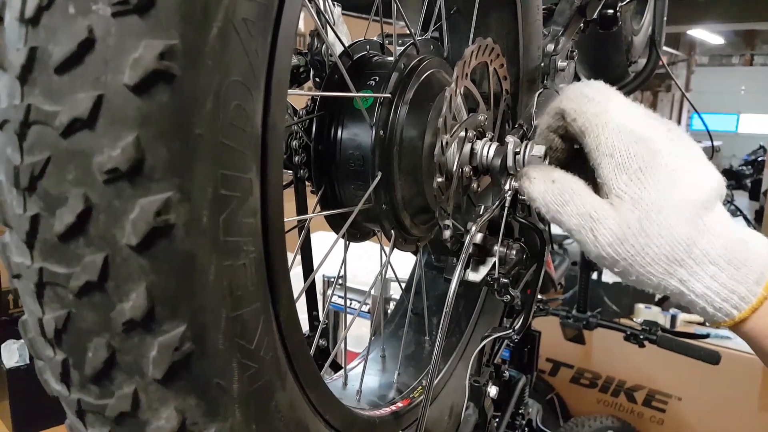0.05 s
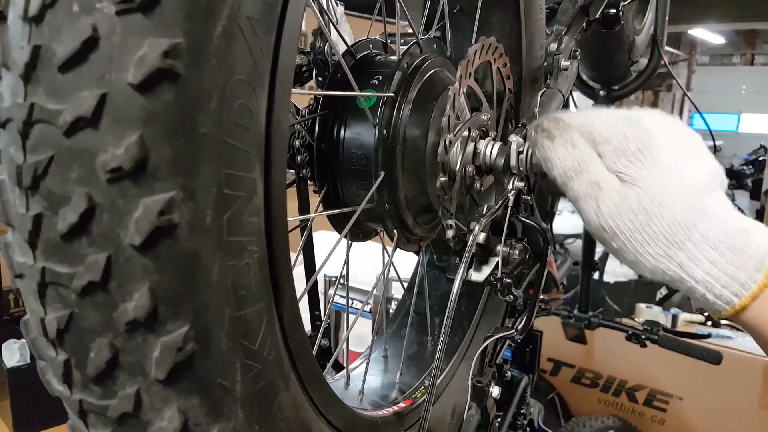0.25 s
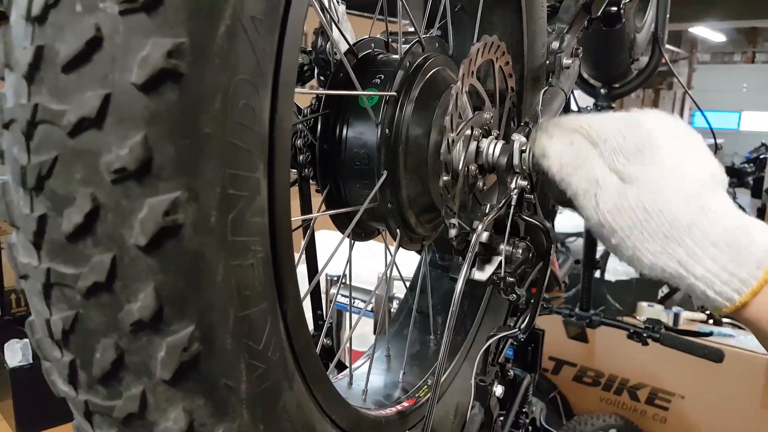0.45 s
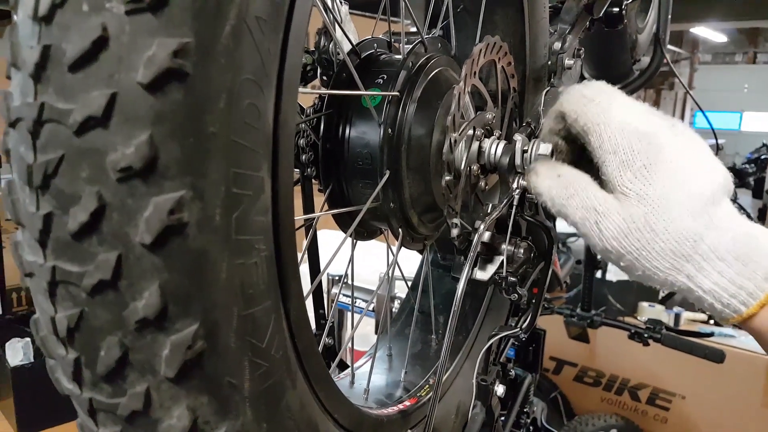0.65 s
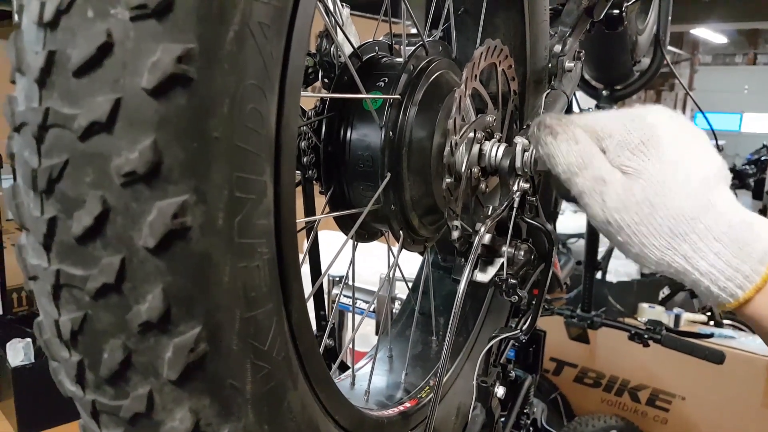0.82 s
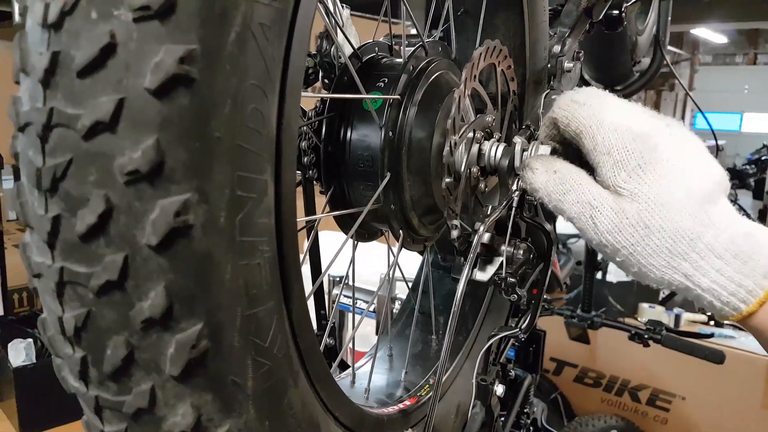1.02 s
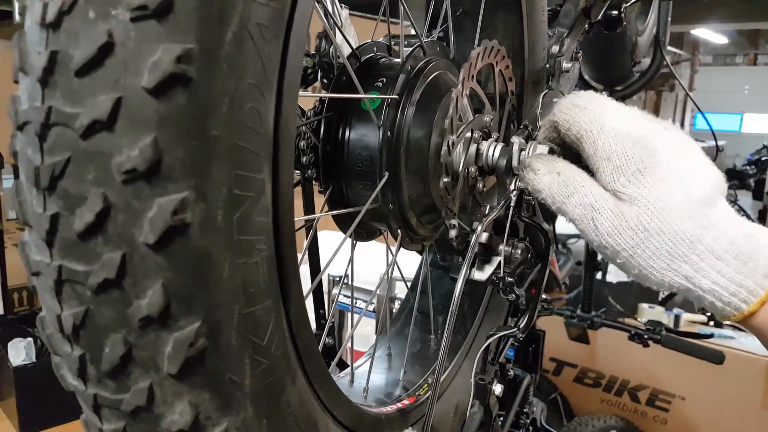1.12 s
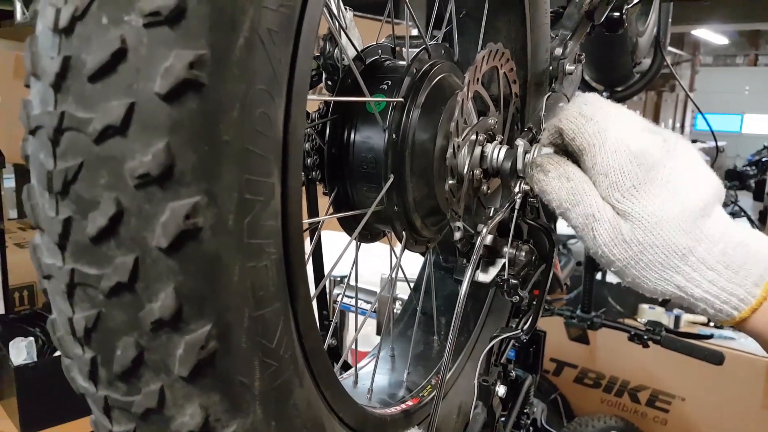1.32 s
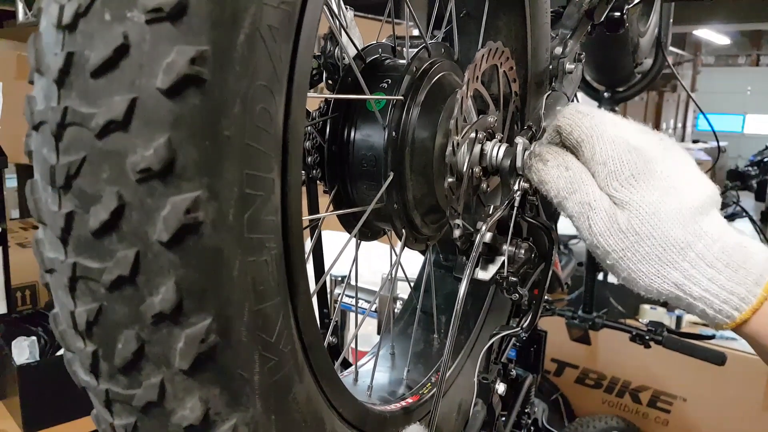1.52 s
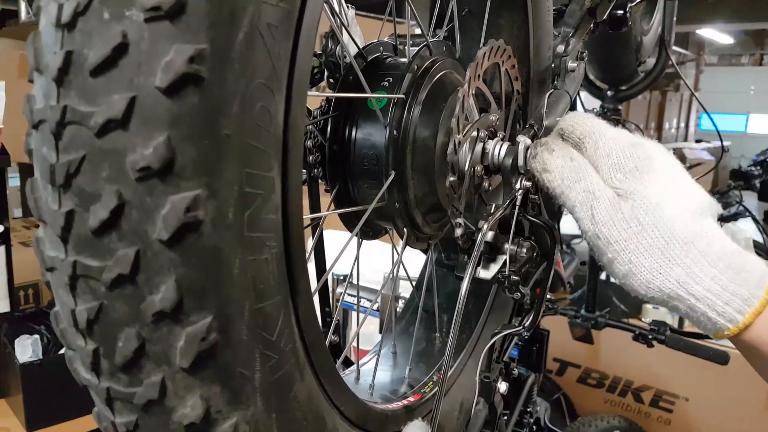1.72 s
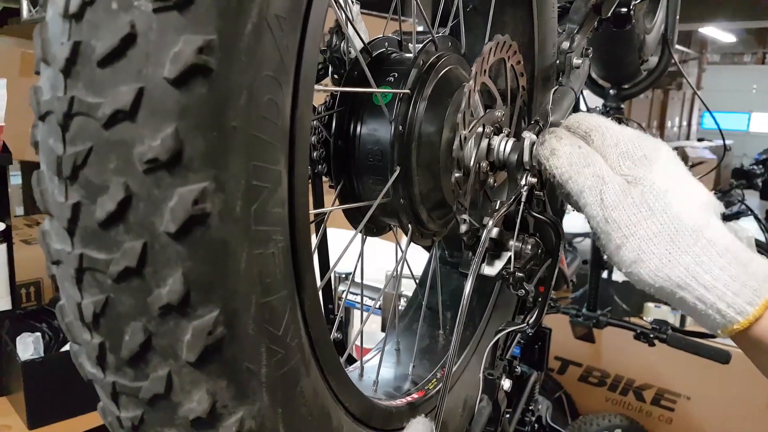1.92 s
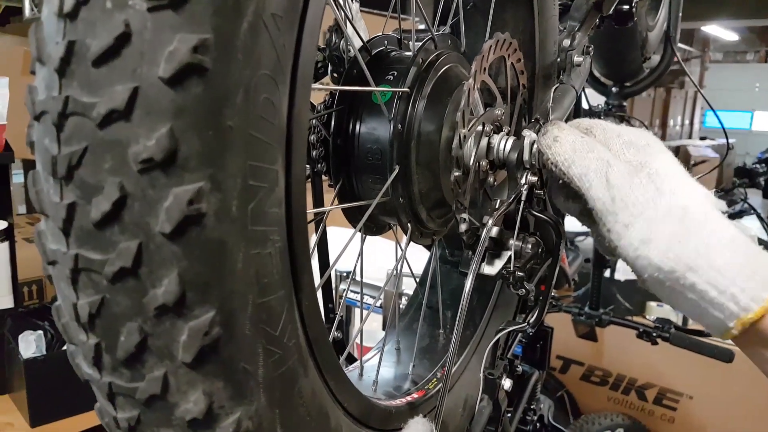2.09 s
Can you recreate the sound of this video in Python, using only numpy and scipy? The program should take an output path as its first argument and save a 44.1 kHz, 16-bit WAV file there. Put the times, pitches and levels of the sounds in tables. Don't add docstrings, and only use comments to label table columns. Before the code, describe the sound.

Nut rattling along an axle thread in quick ringing bursts, then slow light clicks in a garage

```python
import sys
import numpy as np
from scipy import signal
from scipy.fft import rfft, irfft
from scipy.io import wavfile
from scipy.ndimage import uniform_filter1d

SR = 44100
rng = np.random.default_rng(int(sys.argv[2]) if len(sys.argv) > 2 else 0)


def unload_wav(signal):
    wavfile.write(
        sys.argv[1],
        SR,
        np.round(np.clip(np.atleast_2d(signal).T, -1, 1) * 32767).astype(np.int16),
    )


def invert_db(x):
    u = np.asarray(x, float) / 20
    return 10 ** u


N = 94815
T = np.arange(N) / SR

# pitch_hz, width_hz, level_db
HUM = [(60, 0.6, -66.5), (110, 100, -66), (990, 3.3, -77)]
# freq_hz, level_db
AIR_SPECTRUM = [(18, -46), (30, 7), (116, -26), (185, -13), (267, -13), (415, -17.5), (2370, -23),
                (7000, -32.5), (15000, -43)]
# start_s, level_db,
# centre_hz, width_hz, decay_t60_s
THUMPS = [(.002, -37.5, 1160, 199, 0.3), (.09, -64, 110, 50, 0.91), (0.215, -36.5, 3830, 2590, 0.18),
          (0.262, -57.5, 102, 62.4, 0.85), (0.438, -37, 4500, 1500, 0.11), (0.388, -47, 460, 400, 1),
          (0.394, -45.5, 181, 68, 0.34), (0.829, -48, 110, 69, .4), (0.834, -52.5, 283, 152, 0.55),
          (1.224, -49, 400, 486, 0.58), (1.227, -56, 634, 122, 0.26), (1.228, -63, 3130, 200, 0.31),
          (1.232, -45.5, 195.5, 70.5, 0.35), (1.308, -58, 600, 203.5, 1), (1.519, -56, 567, 118.6, 0.38),
          (1.648, -58, 600, 149, 0.58), (1.745, -45.5, 677, 110, 0.29), (1.815, -45, 720, 150, 0.17),
          (1.866, -43.5, 720, 155, 0.37), (1.904, -40.5, 258, 110, 0.31), (1.905, -46.5, 98, 49.4, 0.52)]
# start_s, rise_s, fall_s, level_db, whistle_share_db
SCRAPES = [
    (0.047, 0.033, 0.016, -36.5, -5.5),
    (0.228, 0.012, 0.082, -46, -54),
    (0.307, 0.049, 0.011, -70.5, 21),
    (0.581, 0.078, 0.022, -37, -13.5),
    (0.874, 0.034, 0.0096, -41, -1.5),
]
# freq_hz, level_db
CLOTH_SPECTRUM = [(120, -87), (200, -43.5), (967, -10.5), (1640, -17), (3680, -13.5), (6150, -23),
                  (9770, -49), (12000, -90), (15600, -85), (22000, -120)]
# start_s, level_db, hub_share_db
SPIN_A = [(0.0963, -48, -9), (0.1175, -29.5, -17), (0.142, -29, -7.5), (0.1635, -33.5, -3),
          (0.1806, -29.5, -26), (0.1991, -37, 6.5), (0.2139, -29, -9.5), (0.2351, -39, 8.5),
          (0.2521, -36, 2), (0.2786, -37, 7.5), (0.2916, -44, 7.5), (0.3067, -40, 8), (0.3214, -38, 8.5)]
# start_s, level_db, hub_share_db, nut_ring_hz, hub_ring_hz
SPIN_B = [(0.437, -25, 1.5, 7600, 4100), (0.4761, -24, -9, 4900, 2540), (0.5101, -22, -17.5, 6800, 2670),
          (0.5435, -23, -13.5, 5600, 2630), (.574, -23, -2.5, 5600, 2620), (0.6052, -21.5, -10, 6300, 2800),
          (0.636, -23, -8, 5410, 2720), (0.6675, -24.5, -3.5, 5700, 2970),
          (0.7028, -22.5, -7.5, 5900, 3010)]
# start_s, level_db, hub_share_db
SPIN_C = [(0.874, -30.5, 0.5), (.904, -29, -5.5), (.928, -34, -12), (.948, -28, -6.5), (.971, -32, -5.5),
          (.997, -30.5, -7), (1.0313, -31, -4.5)]
# start_s, level_db, hub_share_db, nut_ring_hz, hub_ring_hz
SLOW_CATCHES = [(1.2254, -62, 19, 6300, 2300), (1.3075, -29, -3, 5330, 2200), (1.3956, -30, -3, 5590, 2230),
                (1.518, -30, -7.5, 5720, 2220), (1.6444, -30.5, -3, 6050, 2550),
                (1.7433, -31, -8.5, 5790, 2340), (1.8146, -30, -4, 6040, 2970),
                (1.868, -30, -0.5, 5440, 3140)]
# freq_hz, width_hz, level_db
NUT_MODES = [(5170, 83, -36), (5670, 35, 2.5), (5600, 420, -5), (6450, 17, 6), (7100, 470, -0.5),
             (8180, 39, -0.5), (9860, 160, -4.5), (12600, 140, -3), (14500, 110, 2)]
# freq_hz, width_hz, level_db
NUT_SLOW_MODES = [(5300, 175, 3), (6700, 180, 10.5), (8260, 53, 4.5), (9700, 110, 3), (10300, 47, -13),
                  (12700, 750, 8.5), (14300, 120, 5)]
# freq_hz, width_hz, level_db
HUB_MODES = [(573, 14.3, 8), (990, 28, -1), (2140, 26, 0.5), (2940, 75, 3.5), (3830, 69, 1.5),
             (4450, 70, 0)]
# freq_hz, width_hz, level_db
HUB_SLOW_MODES = [(2270, 22, -21), (5270, 450, -20)]
# freq_hz, t60_s
ROOM_T60 = [(125, 0.57), (500, 0.78), (2000, 0.58), (6000, 0.5), (14000, 0.3)]
# start_s, rise_s, fall_s, level_db
GUSTS = [
    (.7388, 0.00069, 0.006, -2),
    (.7465, 0.00054, 0.0072, -15.5),
    (0.762, 0.0095, 0.0065, -18.5),
    (0.774, 0.0074, 0.02, -25.5),
]
# freq_hz, level_db
GUST_SPECTRUM = [(300, -4.5), (750, -9.5), (1100, -6.5), (2200, -6.5), (4300, -12), (6800, -20.5),
                 (8600, -67), (10500, -24), (14000, -37)]
# start_s, level_db
POPS = [
    (0.7376, -15),
    (0.7458, -18.5),
]
# pitch_hz, level_db
FLUTTER = [(58, -28.5), (100, -20), (143, -19.5), (240, -26.5), (530, -28), (1725, -25), (2100, -26.5)]
# start_s, level_db
PINGS = [
    (.813, -42),
    (1.257, -38),
]
# freq_hz, left_over_right_db
PORT_BALANCE = [(100, -1.5), (1000, -0.5), (4000, -2.5), (8000, 2.5), (14000, -0.5)]

FAST_NUT_DB, FAST_HUB_DB, FAST_FLOOR_HZ = -11, 0.5, 600
SLOW_NUT_DB, SLOW_HUB_DB, SLOW_FLOOR_HZ = -5.5, -7.5, 1820
BOUNCE_DELAY_S, BOUNCE_DULL_HZ = 0.0046, 8000
CLEAR_CHATTER_S, CLEAR_BOUNCE_DB = 0.0025, 3
LOOSE_CHATTER_S, LOOSE_BOUNCE_DB = 0.0038, 0
CHATTER_ROUGH_DB, PORT_UNLIKE = 4, 0.7
STRIKE_DIP_HZ, STRIKE_DIP = 6500, 0.6
MODE_WIDEN, MODE_SCATTER_DB, MODE_JITTER = 2.5, 2.5, 0.015
ROOM_WIDEN, DIRECT_BROAD_DB = 4.5, -7
BROAD_NUT_DB, BROAD_HUB_DB = -8, -6
NUT_RING_DB, HUB_RING_DB, RING_ROOM_DB = 8.5, 9, 14
RING_WIDTH_HZ, RING_ECHO_DB = 170, -7


def unit(x):
    return x / rms(x)


def rms(x):
    return np.sqrt(np.mean(x ** 2, axis=-1, keepdims=True))


def curve(table, hz):
    table = np.array(table, float)
    return np.interp(np.log(hz + 1), np.log(table[:, 0]), table[:, 1])


def shaped(x, gain):
    n = x.shape[-1]
    return irfft(rfft(x) * gain(np.arange(n // 2 + 1) * SR / n), n)


def coloured(table):
    return unit(shaped(rng.standard_normal(N), lambda f: invert_db(curve(table, f))))


def peak(f, hz, width_hz):
    return 1 / (1 + 2j * (f - hz) / width_hz)


def bump(start_s, rise_s, fall_s):
    rise = np.exp(-((T - start_s) / rise_s) ** 2)
    fall = np.exp(-np.maximum(T - start_s, 0) / fall_s)
    return np.where(T < start_s, rise, fall)


def flicker(rate_hz):
    return unit(shaped(rng.standard_normal(N), lambda f: 1 / (1 + (f / rate_hz) ** 2)))


def background():
    hum = 0
    for hz, width_hz, db in HUM:
        hum = hum + invert_db(db) * unit(shaped(rng.standard_normal(N), lambda f: peak(f, hz, width_hz)))
    air = invert_db(-62.5) * np.array([coloured(AIR_SPECTRUM), coloured(AIR_SPECTRUM)])
    wake_s = 0.14
    swell = 1 - np.exp(-(T / wake_s + 0.5) ** 4)
    return (hum + air) * swell


def thumps():
    out = 0
    for start_s, db, hz, width_hz, t60_s in THUMPS:
        noise = rng.standard_normal((2, N))
        mid, side = unit(shaped(noise, lambda f: peak(f, hz, width_hz) ** 2 * f / (f + 80)))
        stereo = mid + 0.22 * side * np.array([[1], [-1]])
        out = out + invert_db(db) * bump(start_s + 0.0011, 0.0037, t60_s / np.log(1000)) * stereo
    return out


def glove():
    hiss = coloured(CLOTH_SPECTRUM) * invert_db(2.5 * flicker(90))
    whistle = unit(shaped(rng.standard_normal(N), lambda f: peak(f, 995, 45)))
    out = 0
    for start_s, rise_s, fall_s, db, whistle_db in SCRAPES:
        out = out + invert_db(db) * bump(start_s, rise_s, fall_s) * (hiss + invert_db(whistle_db) * whistle)
    return out


def body(modes, f, broad):
    wide = np.array([1, ROOM_WIDEN])[:, None, None]
    response = broad * invert_db(np.array([DIRECT_BROAD_DB, 0]))[:, None, None]
    for hz, width_hz, db in modes:
        level_draw, pitch_draw = rng.standard_normal(2)
        mode = peak(f, hz * (1 + MODE_JITTER * pitch_draw), wide * MODE_WIDEN * width_hz)
        response = response + invert_db(db + MODE_SCATTER_DB * level_draw) * mode / np.sqrt(wide)
    return response


def struck(hz, u, strikes):
    damp = np.pi * RING_WIDTH_HZ * np.array([[1], [1], [ROOM_WIDEN]])
    out = 0
    for delay_s, db in strikes:
        v = np.maximum(u - delay_s, 0)
        onset = 1 - np.exp(-v / 0.00053)
        out = out + invert_db(db) * onset * np.exp(-damp * v) * np.sin(2 * np.pi * hz * v)
    return out


def thread_chatter(u, clear):
    n = len(u)
    length_s = CLEAR_CHATTER_S if clear else LOOSE_CHATTER_S
    bounce_db = CLEAR_BOUNCE_DB if clear else LOOSE_BOUNCE_DB
    dip = STRIKE_DIP if clear else 0

    def lump(v):
        v = np.maximum(v, 0)
        return v / length_s * np.exp(1 - v / (length_s / 2))

    common, rough, unlike = rng.standard_normal((3, n))
    grit = np.array([common + PORT_UNLIKE * unlike, common - PORT_UNLIKE * unlike])
    grit = grit * invert_db(CHATTER_ROUGH_DB * rough)
    bounce = shaped(grit * lump(u - BOUNCE_DELAY_S), lambda f: 1 / (1 + (f / BOUNCE_DULL_HZ) ** 2))
    strike = shaped(grit * lump(u),
                    lambda f: 1 - dip * np.exp(-np.log2((f + 1) / STRIKE_DIP_HZ) ** 2 * 3))
    direct = strike + invert_db(bounce_db) * bounce
    blunt = np.sqrt(uniform_filter1d(np.abs(rfft(direct)) ** 2, size=160))
    return np.array([direct, np.roll(irfft(blunt, n), shift=120, axis=1)])


def catches(rows, nut, hub, nut_db, hub_db, floor_hz):
    n = 4096
    out = np.zeros((3, N + n))
    u = np.arange(n) / SR
    f = np.arange(n // 2 + 1) * SR / n
    nut_broad = invert_db(BROAD_NUT_DB) * peak(f, 5000, 13000) * f ** 2 / (f ** 2 + 4000 ** 2)
    hub_broad = invert_db(BROAD_HUB_DB) * peak(f, 2800, 2600)

    def ring(chatter, modes, broad):
        x = shaped(chatter, lambda f: body(modes, f, broad))
        return x / np.sqrt(np.mean(x[0, :, :500] ** 2))

    for start_s, db, hub_share_db, *ring_hz in rows:
        chatter = thread_chatter(u, bool(ring_hz))
        nut_sound = ring(chatter, nut, nut_broad)
        hub_sound = shaped(ring(chatter, hub, hub_broad), lambda f: 1 / (1 + (floor_hz / (f + 1)) ** 7))
        both = nut_sound + invert_db(hub_share_db + hub_db) * hub_sound
        sound = np.array([both[0, 0], both[0, 1], both[1, 0]])
        if ring_hz:
            nut_ring = struck(ring_hz[0], u, [(0, RING_ECHO_DB), (BOUNCE_DELAY_S, 0)])
            hub_ring = struck(ring_hz[1], u, [(0, 0), (BOUNCE_DELAY_S, RING_ECHO_DB / 2)])
            clear = invert_db(NUT_RING_DB) * nut_ring + invert_db(HUB_RING_DB + hub_share_db) * hub_ring
            sound += invert_db(np.array([0, 0, RING_ROOM_DB]))[:, None] * clear
        i = int((start_s - 0.0003) * SR)
        out[:, i:i + n] += invert_db(db + nut_db) * sound
    return out[:, :N]


def garage(x):
    u, tail = T[:SR], 0
    for hz in 90 * 2 ** np.arange(0, 8, 0.5):
        band = shaped(rng.standard_normal((3, SR)),
                      lambda f: np.exp(-(np.log2((f + 1) / hz) * 2) ** 2))
        tail = tail + band * invert_db(-60 * u / curve(ROOM_T60, hz))
    likeness, rise_s = 0.15, 0.005
    tail = np.sqrt(likeness) * tail[2] + np.sqrt(1 - likeness) * tail[:2]
    tail = tail * (1 - np.exp(-(u / rise_s) ** 2))
    return invert_db(-5.5) * signal.fftconvolve(x[None], unit(tail) / np.sqrt(SR), axes=1)[:, :N]


def puff():
    rasp = shaped(coloured(GUST_SPECTRUM), lambda f: f ** 2 / (f ** 2 + 200 ** 2))
    rasp = rasp * invert_db(2.5 * flicker(230))
    first_gust_top_db, overload, pop_s = -23, 0.36, 0.0006
    gusts = 0
    for k, (start_s, rise_s, fall_s, db) in enumerate(GUSTS):
        if k == 0:
            db = min(db, first_gust_top_db)
        gusts = gusts + invert_db(db) * bump(start_s, rise_s, fall_s)
    blow = overload * np.tanh(rasp * gusts / overload)
    pops = sum(invert_db(db) * np.exp(-((T - start_s) / (pop_s / 2)) ** 2) for start_s, db in POPS)
    flutter = sum(invert_db(db) * np.sin(2 * np.pi * hz * (T - 0.768)) for hz, db in FLUTTER)
    flutter = flutter * bump(0.765, 0.015, 0.0044)
    leak = unit(shaped(rng.standard_normal(N), lambda f: peak(f, 12300, 5800) ** 3))
    leak = invert_db(-36) * leak * bump(0.781, 0.021, 0.022)
    return blow - pops + flutter + leak


def ping():
    pitch_hz, t60_s = 14080, 0.055
    level = sum(invert_db(db) * bump(start_s + 0.0027, 0.001, t60_s / np.log(1000)) for start_s, db in PINGS)
    return level * np.sin(2 * np.pi * pitch_hz * T + flicker(60))


def scene():
    spins = catches(SPIN_A + SPIN_B + SPIN_C, NUT_MODES, HUB_MODES,
                    FAST_NUT_DB, FAST_HUB_DB, FAST_FLOOR_HZ)
    slow = catches(SLOW_CATCHES, NUT_SLOW_MODES, HUB_SLOW_MODES,
                   SLOW_NUT_DB, SLOW_HUB_DB, SLOW_FLOOR_HZ)
    near = spins + slow + glove()
    left, right = near[:2] + garage(near[2]) + ping() + thumps() + background()
    lag_samples = 16
    left = shaped(np.roll(left, lag_samples), lambda f: invert_db(curve(PORT_BALANCE, f)))
    return np.array([left, right + puff()])


def roll_off(x):
    return signal.sosfilt(signal.butter(12, 15980, fs=SR, output="sos"), x)


def record(dry):
    mix = shaped(dry, lambda f: 1 / (1 + (f / 14560) ** 160) * f ** 4 / (f ** 4 + 45 ** 4))
    return roll_off(mix)


dry = scene()
out = record(dry)
unload_wav(out)
```